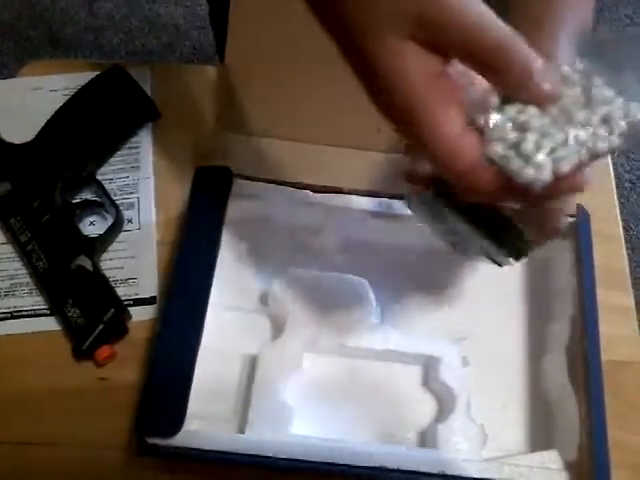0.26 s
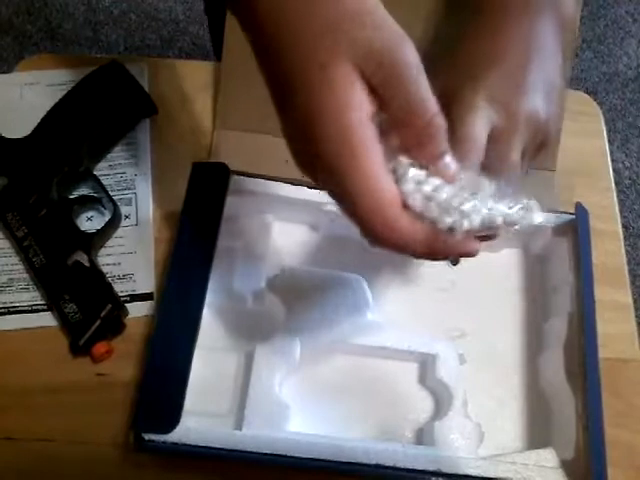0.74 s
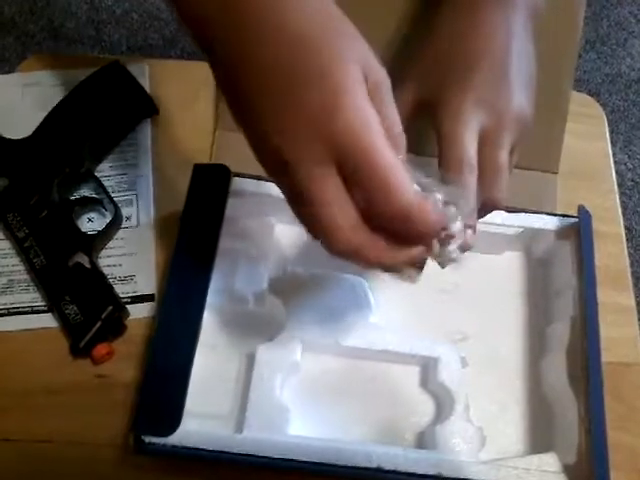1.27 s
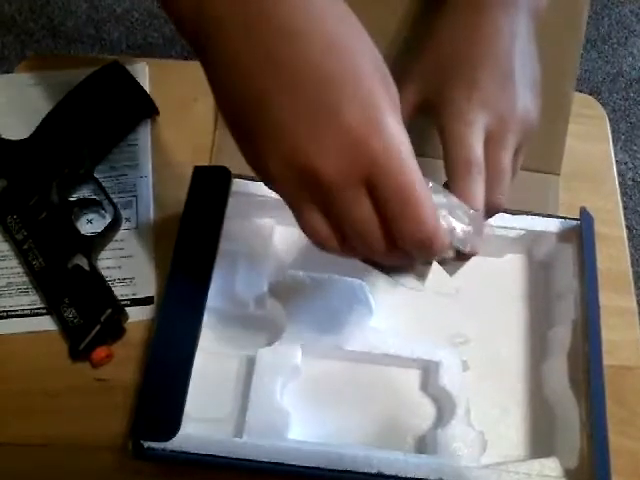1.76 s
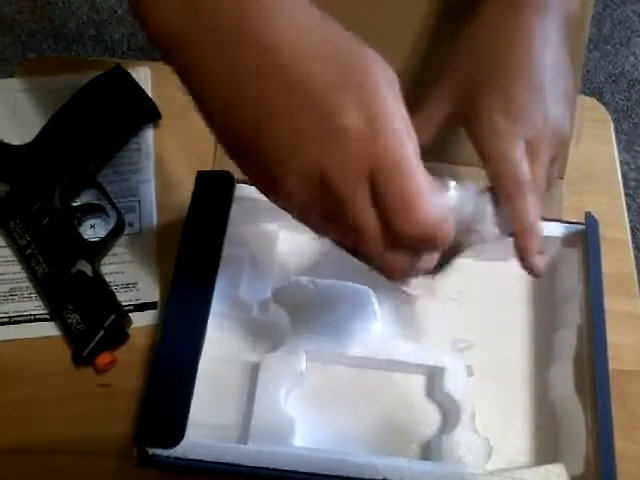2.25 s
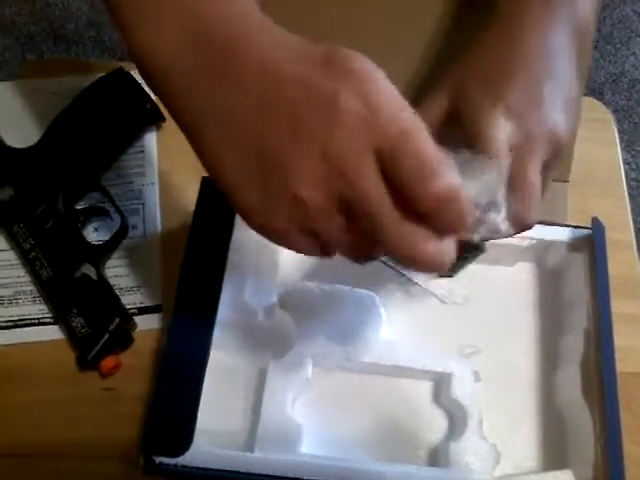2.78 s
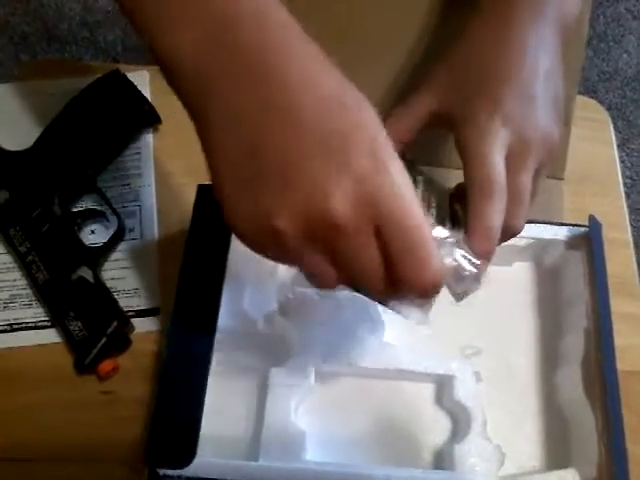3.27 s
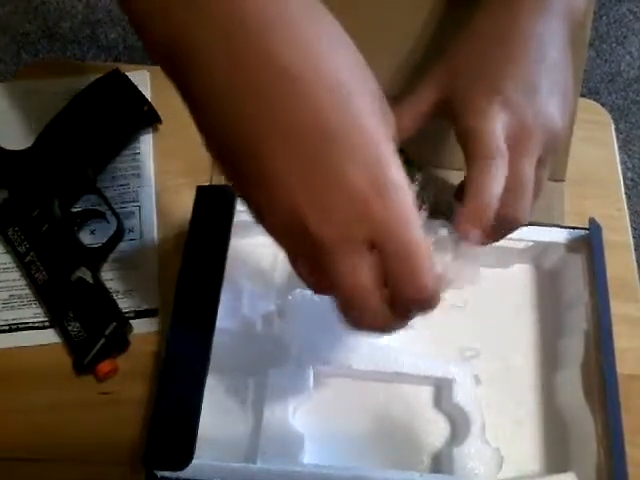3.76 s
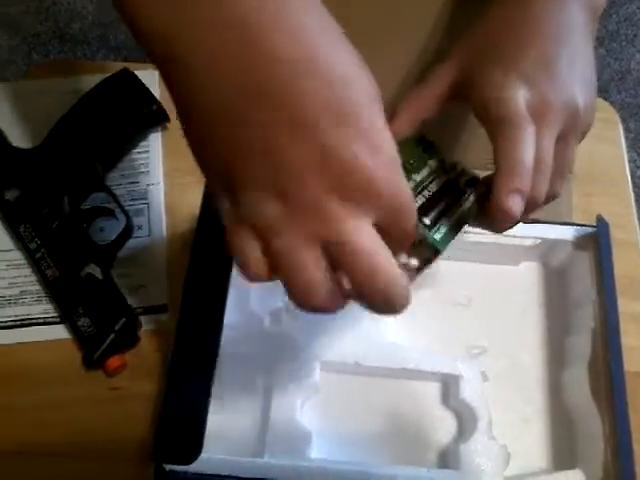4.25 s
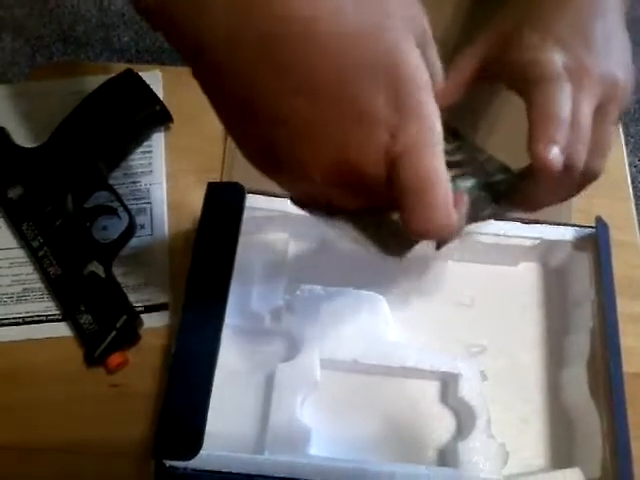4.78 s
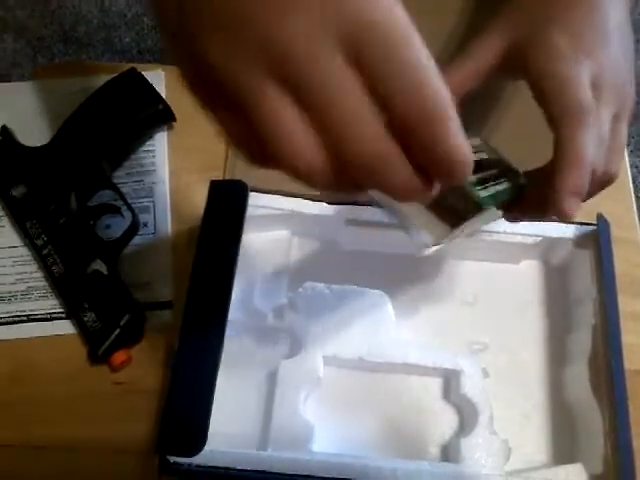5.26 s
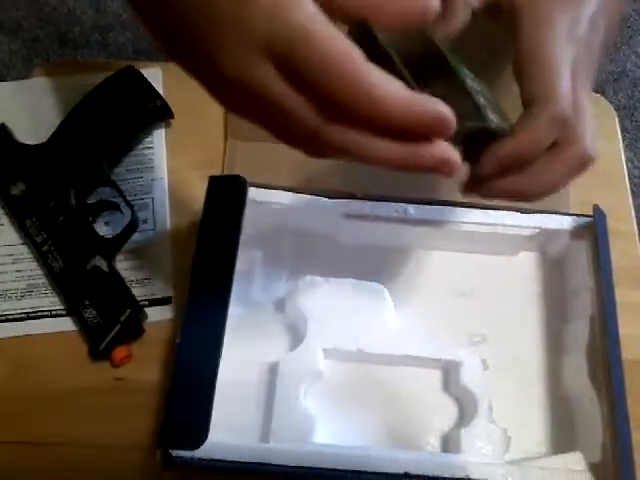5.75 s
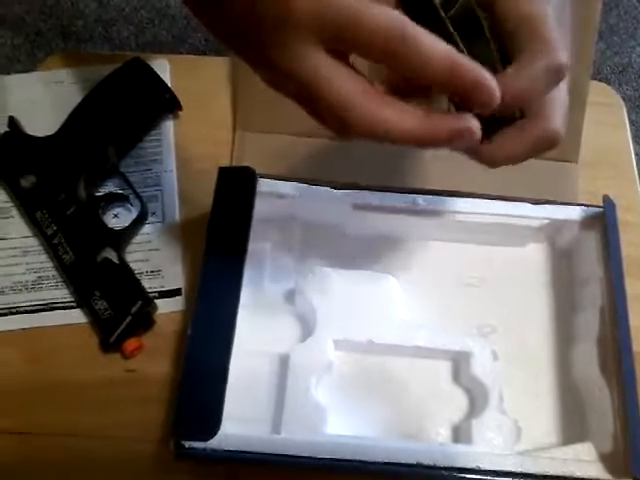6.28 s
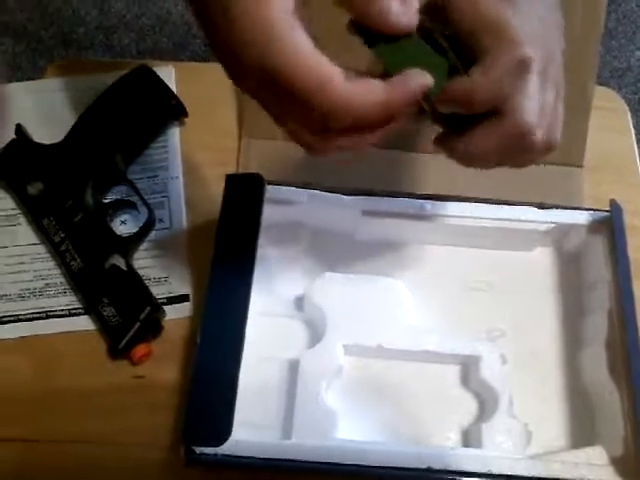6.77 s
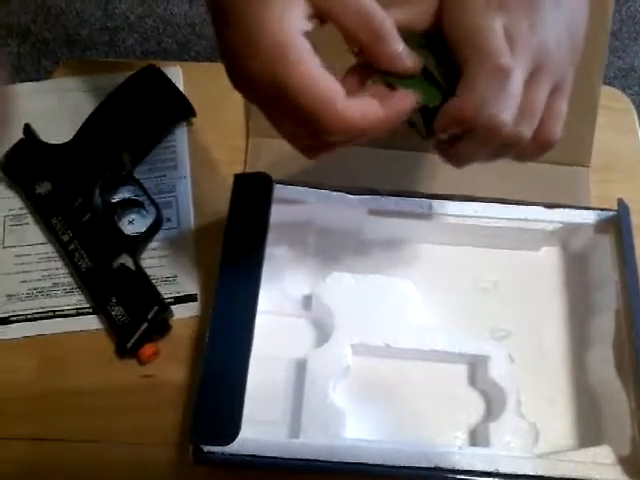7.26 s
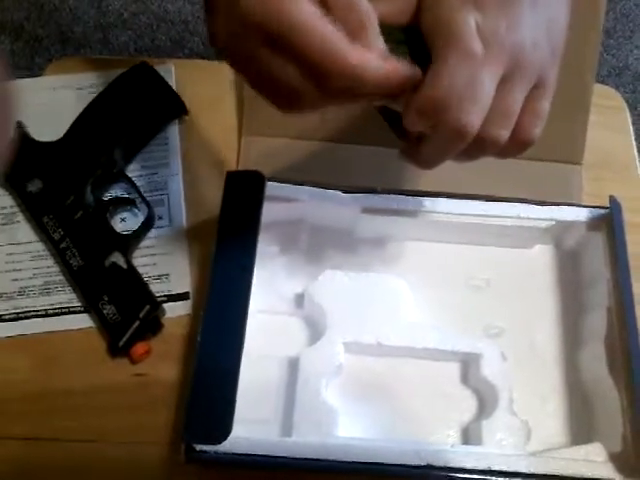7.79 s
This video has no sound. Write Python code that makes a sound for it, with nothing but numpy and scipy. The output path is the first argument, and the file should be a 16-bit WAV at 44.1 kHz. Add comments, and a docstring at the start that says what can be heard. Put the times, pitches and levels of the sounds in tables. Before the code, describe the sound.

A close microphone in a small room with short reflections and a low, wavering fan-like hum. At 0 s a thin plastic bag crinkles with a few sharp snaps, then eases to light sliding hiss and a small click near 0.57 s. From about 1.1 s the film crumples hard, crackling densely, fingers and pellets scraping beneath; a bright hard plastic click lands at 1.95 s. Between 2 and 3.2 s the crackle comes in shorter, uneven squeezes. It builds again from 3.25 s, peaking around 4.0-4.6 s with loud crisp snaps and several hollow plastic knocks. After 4.7 s it drops to sparse, soft rustles and faint taps near 5.55 and 6.4 s. A tight part creaks in quick, squeaky slips at 6.53-6.64 s, and a catch clacks brightly at 7.12 s. Quiet fumbling follows, with a small click at 7.96 s.

```python
"""Hands squeeze a thin plastic bag of pellets against a cardboard box, close up in a small, faintly humming room.
From the start, grip after grip, the film crackles (clumped random ticks over sliding hiss), fingers and pellets
scrape (noise and stirred resonances) and creases snap (short coloured bursts). Hard parts soon knock (rough
contact forces ring plastic bodies); late on, a tight part creaks as it sticks and slips and a catch clacks home.
A near wall and a diffuse tail answer every sound."""
import sys
import numpy as np
from scipy import signal
from scipy.fft import rfft, irfft, next_fast_len
from scipy.io import wavfile
from scipy.ndimage import map_coordinates

SR = 44100
rng = np.random.default_rng(int(sys.argv[2]) if len(sys.argv) > 2 else 0)


def wav_record(signal):
    """Record a signal, one row per channel, as 16-bit PCM in the file named by sys.argv[1]."""
    frames = np.transpose(np.atleast_2d(signal))
    bounded = np.clip(frames, -1, 1)
    # unit amplitude maps onto the largest positive 16-bit level
    quanta = np.round(bounded * 32767).astype(np.int16)
    wavfile.write(sys.argv[1], SR, quanta)


N = 354123
TOP_HZ = 15900

# resonances of the hard parts: centre_hz, width_hz, level_db
PART_MODES = [(484, 460, -1), (983, 75, 1.5), (1180, 210, -7), (1400, 26, 4.5), (1932, 300, 0.5),
              (2960, 200, -5)]
# colour of a snap: freq_hz, gain_db
SNAP_GAIN = [(300, -60), (1000, -1), (2500, -10.5), (4500, -4), (7000, 0.5), (8500, -6.5), (10500, -14),
             (16000, -19.5)]
# colour of a hard plastic click: freq_hz, gain_db
CLICK_GAIN = [(500, -35), (2400, -15.5), (3500, -9.5), (4700, 2.5), (7000, -0.5), (8500, -8),
              (10500, -25.5), (16000, -29.5)]


def amp(db):
    """Decibels to gain."""
    return 10 ** (np.asarray(db) / 20)


def unit(x):
    """Scale to rms 1."""
    return x / np.sqrt(np.mean(x ** 2) + 1e-20)


def along(points, hz):
    """Read (Hz, value) points on a log axis."""
    f, v = np.transpose(points)
    return np.interp(np.log(hz + 1), np.log(f + 1), v)


def curves(rows):
    """One value per sample for each column after the time."""
    s, *cols = np.transpose(rows)
    return [np.interp(np.arange(N) / SR, s, c) for c in cols]


def wobble(rate_hz):
    """A smooth random curve, rate_hz knots a second."""
    knots = rng.standard_normal(int(N * rate_hz / SR) + 4)
    return map_coordinates(knots, [np.arange(N) * rate_hz / SR])


def coloured(x, gain):
    """Causal (minimum-phase) filter with the given gain over frequency."""
    size = 2 * next_fast_len(len(x))
    log_gain = np.log(np.maximum(gain(np.fft.rfftfreq(size, 1 / SR)), 1e-6))
    cepstrum = irfft(log_gain)
    cepstrum[1:size // 2] *= 2  # fold onto positive time
    cepstrum[size // 2 + 1:] = 0
    response = np.exp(rfft(cepstrum))
    return irfft(rfft(x, size) * response)[:len(x)]


def shaped(x, points):
    """Give x the colour of (Hz, dB) points."""
    return coloured(x, lambda f: amp(along(points, f)))


def resonance(modes, f):
    """Gain of a body with (Hz, width Hz, dB) modes, summed in power."""
    power = sum((amp(db) * f * w) ** 2 / ((c * c - f * f) ** 2 + (f * w) ** 2) for c, w, db in modes)
    return np.sqrt(power)


def hump(f, hz, slope_db):
    """A broad emphasis round hz that falls by slope_db an octave."""
    return amp(-slope_db * np.abs(np.log2((f + 1) / hz)))


def burst(t60_s, spike=0):
    """A contact: a first spike on a fast-dying noisy chatter."""
    t = np.arange(SR // 16) / SR
    return rng.standard_normal(len(t)) * amp(-60 * t / t60_s) + spike * (t == 0)


def contact(peak_s):
    """A rough contact force: random signs under an envelope that peaks at peak_s, then lets go."""
    u = np.arange(SR // 16) / SR / peak_s
    return rng.choice([-1, 1], len(u)) * u * np.exp(-u)


def grains(rate_hz, spread_db):
    """Random tiny impulses of uneven size and random sign, rate_hz a second."""
    size = amp(spread_db * np.clip(rng.standard_normal(N), -2, 2))
    return (rng.random(N) < rate_hz / SR) * size * rng.choice([-1, 1], N)


def add(track, start_s, sound, db):
    """Place a sound at start_s with level db over its first 3 ms."""
    head = sound[:round(.003 * SR)]
    levelled = sound * amp(db) / np.sqrt(np.mean(head ** 2))
    span = track[max(round(start_s * SR), 0):][:len(sound)]
    span += levelled[:len(span)]


def background(rumble_db=-2, hiss_db=-71):
    """A wavering hum, as of a distant fan, over low rumble and a faint even hiss."""
    # common level of hum and rumble: time_s, level_db
    low_level = [(0.0, -59), (0.02, -60), (0.45, -64), (1.43, -55), (3.17, -60), (4.47, -54), (5.34, -67),
                 (5.95, -61.5), (6.51, -64.5), (6.64, -56.5), (6.8, -67), (7.18, -59), (7.94, -64.5),
                 (8.03, -61)]
    # rumble colour: freq_hz, gain_db
    rumble_gain = [(12, -37), (25, -10.5), (50, -15), (85, -7.5), (122, 0), (175, -7), (225, -3),
                   (300, -11), (370, -12), (460, -13), (700, -26.5), (1500, -64.5)]
    # hum tones: freq_hz, level_db re low_level
    hum_tones = [(130, -11), (234, -11.5), (269, -10), (319.5, -9.5)]
    # hiss colour: freq_hz, gain_db
    hiss_gain = [(200, -8), (400, -10), (700, -11), (1000, -11), (2800, -17.5), (5000, -17.5),
                 (16000, -22.5)]
    t = np.arange(N) / SR
    rumble = amp(rumble_db) * unit(shaped(rng.standard_normal(N), rumble_gain))
    hum = np.zeros(N)
    for hz, db in hum_tones:
        level = amp(3.5 * wobble(9))
        phase = 2 * np.pi * hz * t + 1.1 * wobble(9)
        hum += amp(db) * unit(level * np.sin(phase))
    hiss = amp(hiss_db) * unit(shaped(rng.standard_normal(N), hiss_gain))
    return (rumble + hum) * amp(curves(low_level)[0]) + hiss


def grips(rise_db_per_s=480, fall_db_per_s=301, arch_db=1, creep_db=-13.5, creep_fall_db_per_s=69.5):
    """Grips tighten fast, hold and relax, the film unfolding on; gives effort in dB for film and rubbing."""
    # squeezes and shifts of grip: start_s, hold_s, film_effort_db, rub_effort_db
    squeezes = [(0, 0.062, -54.5, -64.5), (0.099, 0.088, -66, -72.5), (0.535, .06, -64.5, -67.5),
                (0.692, .09, -59.5, -75.5), (0.787, .2, -54.5, -66.5), (1.018, .12, -50.5, -62.5),
                (1.227, .31, -45, -59), (1.573, 0.036, -37.5, -52), (1.758, 0.063, -41, -52.5),
                (1.892, .12, -40.5, -53.5), (2.079, .05, -55, -65), (2.211, .08, -53, -62),
                (2.294, .06, -46.5, -54), (2.446, .05, -51, -62), (2.589, 0.076, -50, -59.5),
                (2.695, .07, -47.5, -54), (2.881, .03, -63.5, -63), (2.977, .05, -55, -63.5),
                (3.076, .07, -56.5, -65.5), (3.25, .13, -46, -57), (3.492, .13, -49, -58),
                (3.645, .07, -41.5, -50), (3.844, 0.037, -39.5, -49), (3.949, .21, -42, -49),
                (4.207, 0.099, -38.5, -45), (4.346, 0.098, -45, -50), (4.453, .06, -42.5, -47.5),
                (4.58, .055, -42, -46.5), (4.684, 0.15, -59.5, -62), (4.93, .06, -63, -65.5),
                (5.069, 0.013, -61, -63.5), (5.138, .17, -75, -77), (5.558, .06, -67, -68),
                (5.772, .07, -60.5, -63), (5.955, .06, -58, -56.5), (6.076, .07, -70.5, -72.5),
                (6.365, .02, -63, -66.5), (6.546, .09, -58.5, -59.5), (6.864, .07, -73, -69),
                (6.969, .09, -66, -70.5), (7.13, .08, -63.5, -79), (7.515, .03, -59.5, -61.5),
                (7.587, 0.043, -63, -66), (7.704, 0.053, -64, -70.5), (7.957, .06, -63, -65)]
    t = np.arange(N) / SR
    film, rub = np.full(N, -81.), np.full(N, -82.)  # the hands are never quite still
    for s, hold_s, film_db, rub_db in squeezes:
        near = slice(*np.searchsorted(t, [s - .5, s + hold_s + .5]))
        before_s = np.maximum(s - t[near], 0)
        after_s = np.maximum(t[near] - s - hold_s, 0)
        # weaker by arch_db at both ends of the hold
        dip_db = arch_db * (2 * np.clip((t[near] - s) / hold_s, 0, 1) - 1) ** 2
        release_db = np.maximum(-fall_db_per_s * after_s, creep_db - creep_fall_db_per_s * after_s)
        shape_db = release_db - rise_db_per_s * before_s - dip_db
        film[near] = np.maximum(film[near], film_db + shape_db)
        rub[near] = np.maximum(rub[near], rub_db + shape_db)
    return film, rub


def crackle(effort_db, focus_db=7, level_db=-1):
    """Lightly held film slides with a smooth hiss; crumpled, facets of many sizes tick in clumps."""
    # handling of the film: time_s, crumple_share (0 sliding, 1 crumpling)
    handling = [(0, .8), (.5, .8), (.7, .25), (1.1, .3), (1.25, .85), (4.5, .9), (4.95, .4), (8.03, .35)]
    # film colour: freq_hz, gain_db
    film_gain = [(400, -28), (1000, -24.5), (2500, -10), (3300, -3), (4500, -1.5), (6000, 1.5),
                 (7500, -3.5), (9000, -10.5), (10500, -15.5), (16000, -21.5)]
    ticks = np.zeros(N)
    for hz in np.geomspace(3600, 8500, 7):
        facet = coloured(burst(t60_s=.008, spike=3.), lambda f: hump(f, hz, focus_db))
        ticks += signal.oaconvolve(grains(rate_hz=34, spread_db=6.5), unit(facet))[:N]
    slide = shaped(rng.standard_normal(N), [(3000, -4.0), (7500, 1.5), (11000, -3)])
    crumple = np.clip(curves(handling)[0], 0, 1)
    crumpling = np.sqrt(crumple) * unit(shaped(ticks, film_gain))
    sliding = np.sqrt(1 - crumple) * unit(shaped(slide, film_gain))
    clumps_db = 2.4 * wobble(45)
    return (crumpling + sliding) * amp(effort_db + clumps_db + level_db)


def rubbing(effort_db, ring=0.91, level_db=-0.5):
    """Fingers and pellets scrape in small catches that stir the card and the hard parts."""
    # scrape colour: freq_hz, gain_db
    rub_gain = [(200, -23), (450, 0), (700, -8), (950, 4.5), (1400, -3.5), (2100, -7.5), (2800, -4),
                (5000, -9.5), (10000, -41)]
    catches = unit(grains(rate_hz=700, spread_db=8.5)) + 0.6 * rng.standard_normal(N)
    stirred = unit(coloured(grains(rate_hz=600, spread_db=2.5), lambda f: resonance(PART_MODES, f)))
    clumps_db = 2 * wobble(40)
    scrape = unit(unit(shaped(catches, rub_gain)) + ring * stirred)
    return scrape * amp(effort_db + clumps_db + level_db)


def room(x, wall_s=0.0093, wall_db=-12, tail_db=-5, build_s=0.005, count=9):
    """A diffuse tail builds up within a few milliseconds and a near wall answers after 9.3 ms; the tail
    crossfades through a cycle of random tails."""
    # tail: freq_hz, t60_s, colour_db (each tail is then scaled to unit energy)
    tail_bands = [(300, 0.19, -4.5), (900, 0.25, -4), (1475, 0.34, 0), (6000, 0.21, -1), (14100, 0.22, 1)]
    wall = signal.oaconvolve(x, burst(t60_s=0.012, spike=4.7))[:N]
    wet = np.pad(unit(wall) * np.std(x) * amp(wall_db), (round(wall_s * SR), 0))[:N]
    place = np.arange(N) / SR / .12  # next tail every 0.12 s
    bands_hz, t60s, levels_db = np.transpose(tail_bands)
    for k in range(count):
        hz, t, z = signal.stft(rng.standard_normal(SR // 2), SR, nperseg=256)
        t60_s = along(np.c_[bands_hz, t60s], hz)[:, None]
        colour_db = along(np.c_[bands_hz, levels_db], hz)[:, None]
        build = 1 - np.exp(-(t / build_s) ** 2)
        tail = signal.istft(z * amp(colour_db - 60 * t / t60_s) * build, SR, nperseg=256)[1]
        share = np.sqrt(np.maximum(1 - np.abs((place - k) % count - 1), 0))
        wet += amp(tail_db) * signal.fftconvolve(x * share, tail / np.linalg.norm(tail))[:N]
    return wet


def small_creases(effort_db, count=80, growth=.3, over_db=4, spread_db=3.5, top_db=-41):
    """Rows (s, dB) of small creases giving way at random, more often and louder under a harder grip."""
    due = np.cumsum(amp(growth * effort_db))  # rate grows as this power of grip strength
    when, size = rng.random((count, 2)).T
    at = np.searchsorted(due, when * due[-1])
    typical_db = np.minimum(effort_db[at] + over_db, top_db)  # a small facet can only snap so loud
    return list(zip(at / SR, typical_db + spread_db * (2 * size - 1)))


def snaps(effort_db, t60_s=0.013, spike=4.4, focus_db=9):
    """Each crease flips at once and its facet flutters at its own pitch, length and crispness."""
    # big creases that buckle: start_s, level_db over the first 3 ms
    big_creases = [(.0383, -42), (.0634, -39), (.2704, -43), (.5728, -55.5), (1.1013, -55), (1.1674, -44),
                   (1.2074, -37), (1.2528, -37), (1.2848, -35.5), (1.2912, -42), (1.3852, -35.5),
                   (1.412, -38.5), (1.448, -40), (1.4616, -39.5), (1.535, -41.5), (1.5577, -38.5),
                   (1.5794, -30.5), (1.612, -37), (1.681, -32.5), (1.7713, -30.5), (1.8153, -36.5),
                   (1.8804, -33.5), (1.919, -28.5), (1.9963, -41), (2.019, -34), (2.3427, -35.5),
                   (2.4596, -40.5), (2.5562, -41), (2.5947, -39), (2.6951, -38.5), (2.707, -34),
                   (2.7159, -30.5), (2.7684, -39.5), (2.8826, -42), (2.9767, -45.5), (3.0876, -43),
                   (3.1066, -46.5), (3.2302, -39), (3.29, -41), (3.3625, -34.5), (3.375, -40),
                   (3.4925, -40), (3.569, -37), (3.6518, -35.5), (3.684, -33.5), (3.889, -36),
                   (3.945, -32.5), (4.0316, -28.5), (4.0554, -32), (4.0957, -40), (4.169, -26),
                   (4.2281, -24.5), (4.2464, -27), (4.2554, -32), (4.3014, -28.5), (4.309, -32),
                   (4.392, -34), (4.402, -30.5), (4.4562, -31), (4.5355, -39.5), (4.81, -44.5),
                   (4.8543, -47), (5.771, -56.5), (5.942, -53), (5.9775, -50), (6.3806, -59), (7.2049, -50)]
    crease_hz, pitch_spread, length_spread = 5750, .13, 0.38  # spreads are log shares
    crisp_spread_db = 2  # at 10 kHz
    out = np.zeros(N)
    for s, db in list(big_creases) + small_creases(effort_db):
        crisp, length, pitch = rng.standard_normal(3)
        hz = crease_hz * np.exp(pitch_spread * pitch)

        def colour(f):
            tilt_db = crisp_spread_db * crisp * f / 10000
            return amp(along(SNAP_GAIN, f) + tilt_db) * hump(f, hz, focus_db)

        flutter = burst(t60_s * np.exp(length_spread * length), spike)
        add(out, s, coloured(flutter, colour), db)
    return out


def knocks(sharpness=8, shell=.7, focus_db=6, grit=0.11):
    """A hard contact gives a bright click, rings the struck spot at its own pitch and stirs the rest."""
    # blows: start_s, body_db, body_hz, click_db (levels over the first 3 ms)
    blows = [(.538, -56, 1250, -64), (.566, -55.5, 1350, -55), (0.5715, -49, 1240, -39),
             (.874, -48.5, 1220, -60), (1.026, -53.5, 1000, -54), (1.9171, -43.5, 993, -40),
             (1.9482, -34.5, 1410, -23.5), (1.9493, -32, 1965, -20.5), (2.978, -50, 2140, -57),
             (4.085, -44, 1400, -41), (4.141, -51, 1230, -43), (4.207, -38, 1300, -28.5),
             (4.22, -35.5, 1002, -32), (4.244, -36, 1750, -24.5), (4.301, -36.5, 1400, -31),
             (4.328, -41, 1400, -47), (4.469, -38, 940, -31), (4.575, -39.5, 1330, -34.5),
             (4.775, -50.5, 1080, -52), (5.547, -48.5, 1510, -48), (5.553, -50, 848, -60),
             (5.702, -61, 864, -61.5), (6.379, -55.5, 1090, -60.5), (7.093, -51, 900, -68),
             (7.29, -63, 1500, -56), (7.497, -58, 1000, -59.5), (7.523, -60, 1200, -54.5),
             (7.957, -42.5, 2100, -42), (8.004, -61, 1110, -52.5)]
    ref_contact_s, ref_click_db, shortening = 0.0017, -38.5, 0.07  # harder blows are shorter
    out = np.zeros(N)
    for s, body_db, hz, click_db in blows:
        contact_s = ref_contact_s * amp(shortening * (ref_click_db - click_db))
        force = grit * contact(contact_s) * contact_s / .001
        force[0] += .5  # short contacts are mostly push, long ones mostly scrape

        def body(f):
            spot = resonance([(hz, hz / sharpness, 0)], f)
            return (spot + shell * resonance(PART_MODES, f)) * hump(f, hz, focus_db)

        add(out, s, coloured(force, body), body_db)
        add(out, s, shaped(contact(contact_s), CLICK_GAIN), click_db)
    return out


def creak(slip_t60_s=0.011, body_db=-9):
    """A tight plastic part sticks and slips: each slip rasps high and nudges its hollow body."""
    # slips: start_s, rasp_db over the first 3 ms
    slips = [(6.5286, -46), (6.5443, -41), (6.5522, -42.5), (6.5732, -44.5), (6.6013, -44), (6.6197, -51),
             (6.6374, -41)]
    # squeak of the tight part: centre_hz, width_hz, level_db
    squeak_modes = [(4080, 300, -9.5), (5220, 300, -3.5), (6360, 300, -0.5), (7000, 280, -1.5)]
    # hollow body colour: freq_hz, gain_db
    body_gain = [(200, -20), (450, 1), (950, 4), (1400, -27), (2500, -38), (6000, -22)]
    out = np.zeros(N)
    for s, db in slips:
        rasp = coloured(burst(slip_t60_s), lambda f: amp(along(CLICK_GAIN, f)) * resonance(squeak_modes, f))
        add(out, s, rasp, db)
        add(out, s, shaped(burst(slip_t60_s), body_gain), db + body_db)
    return out


def clack(grit=0.037, chatter_s=0.00036, chatter_db=-5):
    """A catch seats in quick contacts, each a brief bright chatter that rings the hollow plastic shell."""
    # contacts of the catch: start_s, shell_db over the first 3 ms
    contacts = [(7.116, -53), (7.1183, -38), (7.1199, -27), (7.1225, -39)]
    # hollow plastic shell: centre_hz, width_hz, level_db
    shell_modes = [(592, 140, -4), (900, 110, 2), (1080, 150, -7), (1300, 130, -9), (2870, 630, -14.5),
                   (4800, 500, -4), (6370, 480, -8), (8090, 400, -9), (9190, 1100, -16)]
    out = np.zeros(N)
    for s, db in contacts:
        force = grit * contact(chatter_s)
        force[0] += 1
        ring = coloured(force, lambda f: resonance(shell_modes, f) / (1 + (f / 10500) ** 6))
        add(out, s, ring, db)
        add(out, s, shaped(contact(chatter_s), SNAP_GAIN), db + chatter_db)
    return out


def scene():
    """All handling sounds in the room."""
    film_db, rub_db = grips()
    film = crackle(film_db) + snaps(film_db)
    hard_parts = rubbing(rub_db) + knocks() + creak() + clack()
    near = film + hard_parts
    return (near + room(near) + background())[None]


def record(dry):
    """The recorder keeps nothing above its band limit."""
    size = next_fast_len(N + SR // 2)
    kept = np.fft.rfftfreq(size, 1 / SR) < TOP_HZ
    return irfft(rfft(dry, size) * kept, size)[..., :N]


dry = scene()
out = record(dry)
wav_record(out)
```